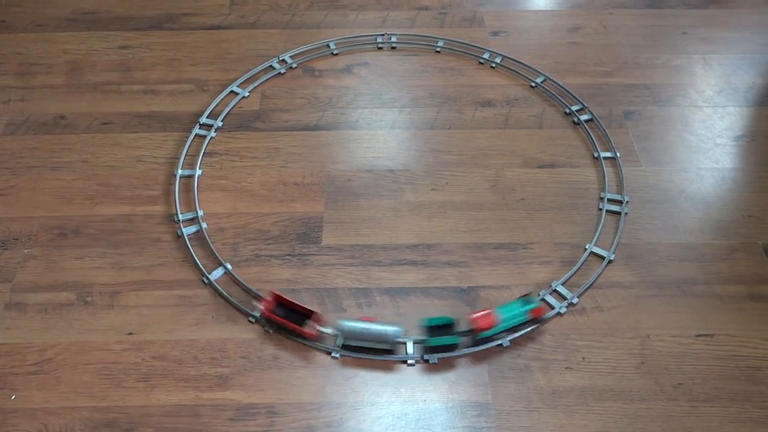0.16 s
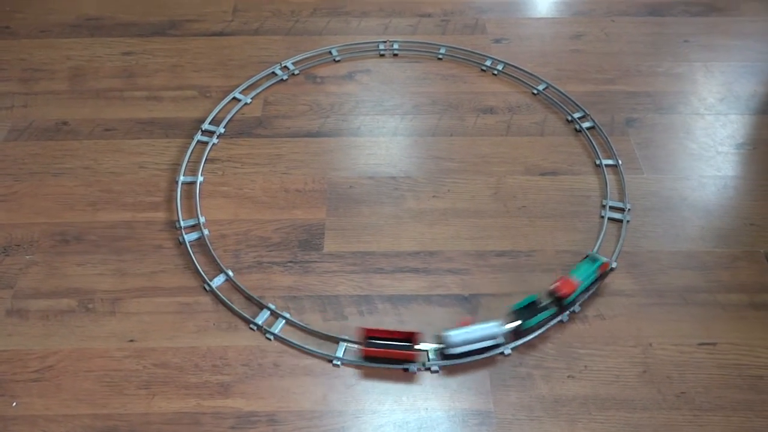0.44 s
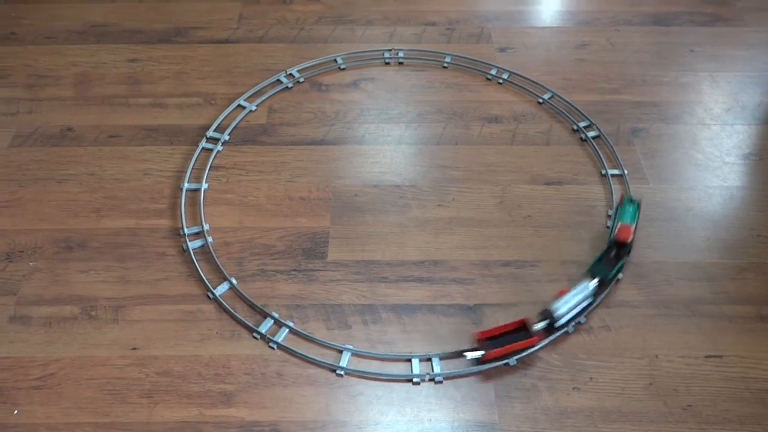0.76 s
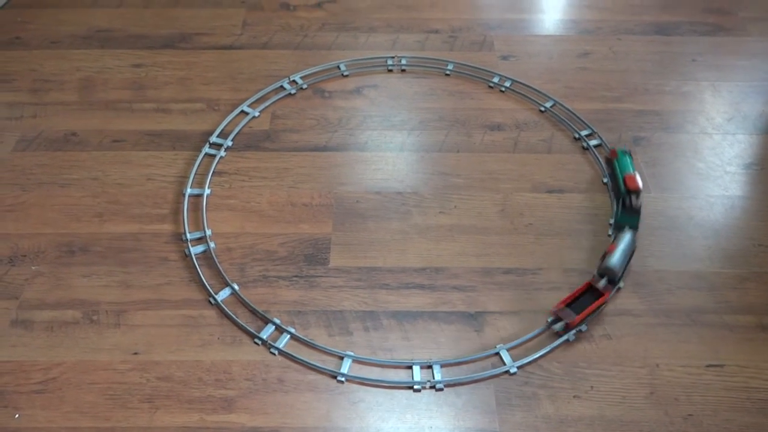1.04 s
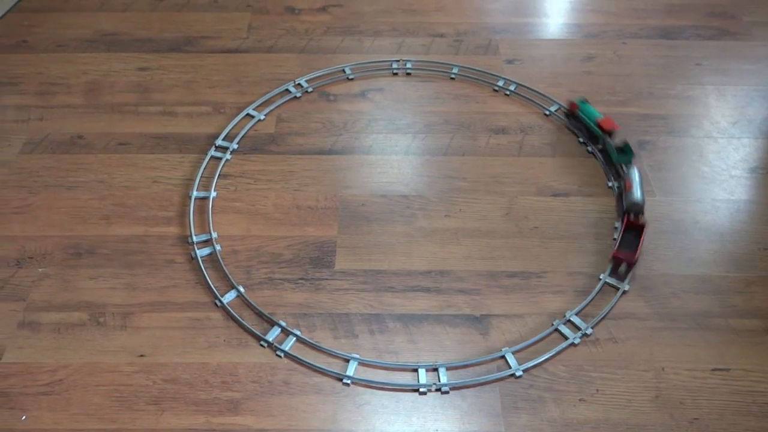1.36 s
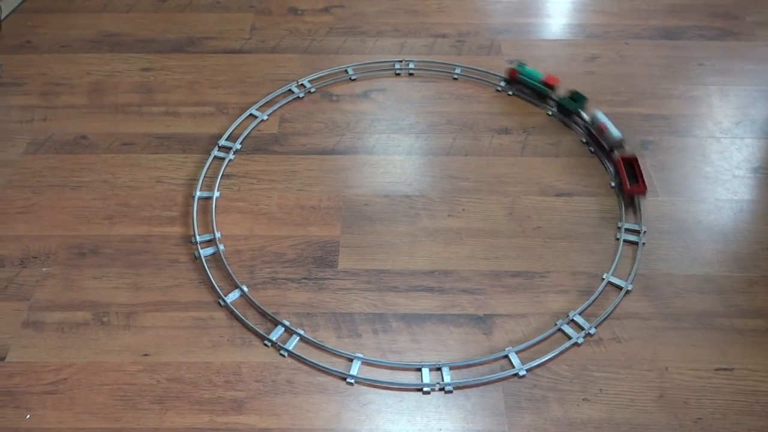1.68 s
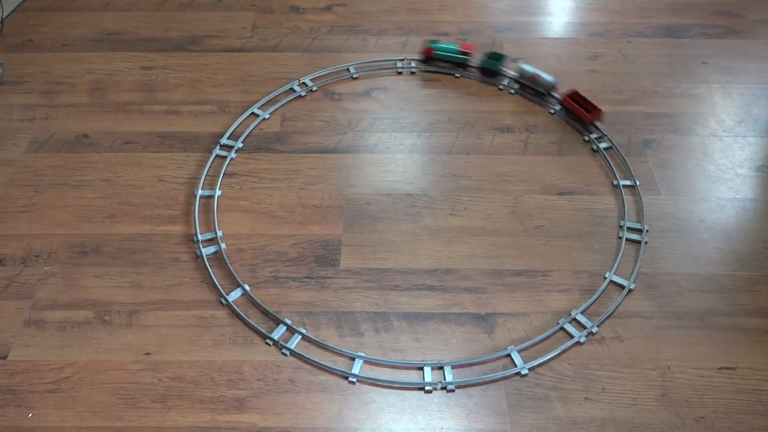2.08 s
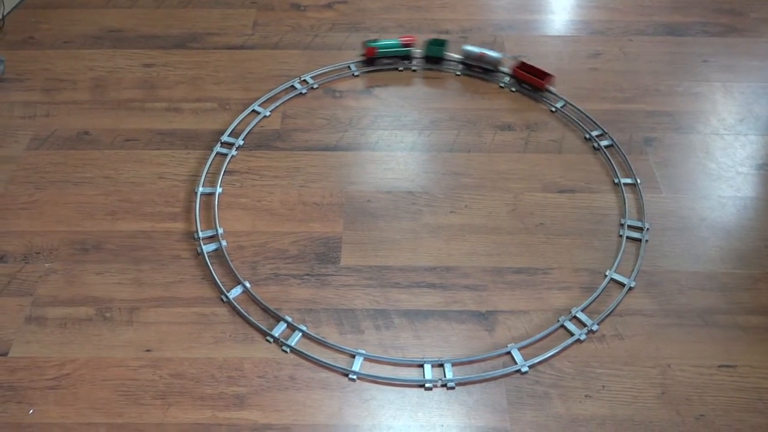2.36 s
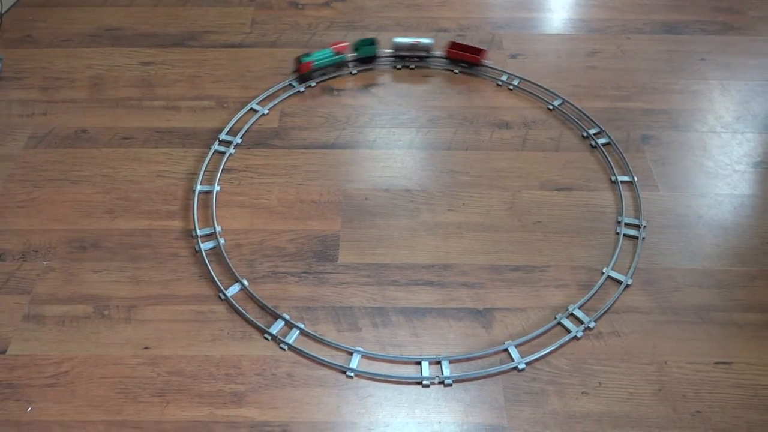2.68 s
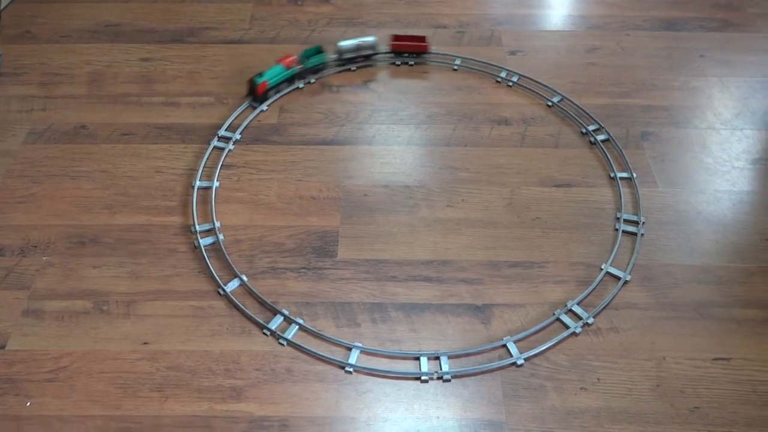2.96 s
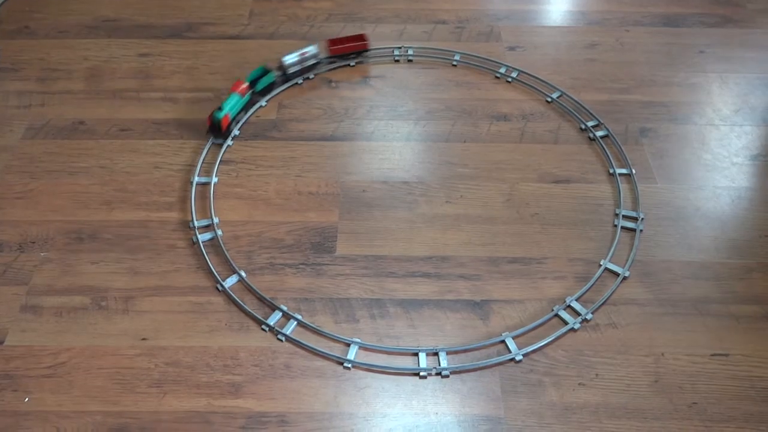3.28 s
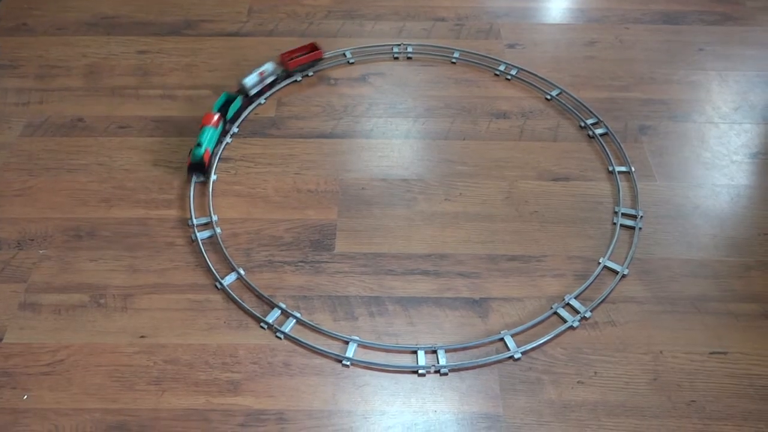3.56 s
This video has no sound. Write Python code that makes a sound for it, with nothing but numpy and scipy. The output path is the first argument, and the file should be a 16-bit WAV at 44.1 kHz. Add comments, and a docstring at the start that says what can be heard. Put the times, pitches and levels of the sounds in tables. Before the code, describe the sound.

A small clockwork toy train whirs continuously on metal track, with dense gear ticking, chattering wheels and sharp irregular joint clacks, softening slightly as it moves away from a nearby microphone in a small room.

```python
"""A clockwork toy train circles on metal track on a hard floor, moving away from the microphone.
Its gear teeth tick densely in the little body: trains of tiny impacts, filtered, with a fuzzy mesh note.
Wheels rumble, loose wheels and couplings chatter in short gated bursts, and small parts ping.
Rail joints clack with a knock and a ring of close modes; the track thuds softly on the floor.
A small room answers in stereo with a short diffuse tail, over a faint, uneven low rumble.
"""
import sys
import numpy as np
from scipy import signal
from scipy.fft import rfft, irfft
from scipy.io import wavfile
from scipy.ndimage import uniform_filter1d

SR = 44100
rng = np.random.default_rng(int(sys.argv[2]) if len(sys.argv) > 2 else 0)


def store_wav(level_fs):
    """Save 16-bit WAV to argv[1]."""
    pcm = np.round(np.clip(np.atleast_2d(level_fs), -1, 1) * 32767)
    wavfile.write(sys.argv[1], SR, pcm.T.astype(np.int16))


N = 164493
T = np.arange(N) / SR
HZ = np.fft.rfftfreq(N, 1 / SR)

# Relative spectrum of the faint low rumble: pitch_hz, level_db
RUMBLE_COLOUR = [(30, -14), (48, -13), (75, -3), (110, -4), (200, 5), (400, -6), (2000, -34)]
# Likeness of left and right in the room: pitch_hz, likeness (0 to 1)
STEREO_LIKENESS = [(60, 1), (170, 0.89), (490, 0.92), (1420, 0.81), (4080, 0.89), (11700, 0.89)]
# Left minus right as the train goes round: time_s, level_db
PAN = [(0, 0.2), (.9, -1.5), (1.7, -.9), (2.6, -0.4), (3.73, .3)]
# Soft thuds of the track on the floor, before smoothing: start_s, level_db
THUDS = [(.41, -51), (.445, -53.5), (.565, -59), (.595, -54), (.73, -54), (.755, -67), (.8, -55),
         (.835, -58), (2.69, -59)]
# Relative spectrum of the thuds: pitch_hz, level_db
THUD_COLOUR = [(20, -21), (70, -10), (120, 0), (180, 10.5), (260, 11), (500, -40)]
# Rolling wheels, before the roll trim: time_s, level_db
ROLL_LEVEL = [(0.03, -37), (0.1, -35.5), (0.26, -43.5), (0.35, -41), (0.5, -42.5), (0.8, -37), (0.87, -46),
              (0.94, -52), (1.02, -40), (1.09, -40.5), (1.13, -33), (1.17, -40.5), (1.55, -39),
              (1.8, -40.5), (2.13, -40.5), (2.2, -44.5), (2.44, -49), (2.49, -38), (2.53, -47.5),
              (2.74, -42.5), (2.81, -37.5), (2.92, -41.5), (3.15, -39.5), (3.23, -47), (3.41, -38),
              (3.55, -43), (3.63, -45), (3.69, -39.5)]
# Relative spectrum of the rolling: pitch_hz, level_db
ROLL_COLOUR = [(40, -45), (130, -37), (250, -30), (290, -19.5), (330, -6.5), (390, -6), (455, 4), (530, 2),
               (600, 3.5), (700, -1), (900, -39.5), (2000, -66.5)]
# Knocks of wheels on rail joints and of couplings: start_s, pitch_hz, knock_db, ring_db
CLACKS = [(.089, 8600, -20, -26), (.203, 4950, -18, -24), (.31, 5000, -22, -24), (.3505, 4900, -17, -26),
          (.5588, 4700, -18, -28), (.602, 10300, -20, -21), (.6105, 8700, -13, -26), (.739, 8500, -16, -29),
          (.921, 2000, -30, -30), (1.238, 4700, -19, -25), (1.383, 8000, -17, -24),
          (1.5965, 4700, -20, -25), (1.881, 10400, -22, -24), (1.9485, 4750, -18, -22),
          (2.005, 8600, -16, -27), (2.0608, 4700, -18, -27), (2.291, 8600, -15, -28),
          (2.336, 10200, -15, -21), (2.3447, 10300, -12, -20), (2.4495, 4800, -24, -23.5),
          (2.645, 9000, -17, -21), (2.8705, 4800, -14.5, -23), (3.3624, 4550, -6.5, -23),
          (3.3694, 4650, -17, -25), (3.371, 8300, -11, -23), (3.3765, 4800, -22, -26),
          (3.3915, 4900, -18, -24), (3.449, 4600, -17, -28), (3.453, 570, -42, -28),
          (3.6445, 7800, -17, -29)]
# Bursts of wheel and coupling chatter: start_s, length_s, level_db, brightness_db
RATTLES = [(0.079, 0.054, -27, -6), (0.179, 0.028, -25.5, -7), (0.302, 0.052, -32, -24),
           (0.392, 0.025, -24, -11), (0.452, 0.012, -22.5, 9), (0.491, 0.033, -22.5, -2),
           (0.552, 0.017, -25.5, -10), (0.604, 0.076, -28, 5), (0.695, 0.026, -24, 0),
           (0.725, 0.026, -24, 5), (0.83, 0.062, -27, 14), (0.906, 0.033, -22.5, -6),
           (1.001, 0.029, -24.5, 3), (1.091, 0.056, -23, 4), (1.212, 0.034, -24, 8),
           (1.375, .028, -21.5, 2), (1.572, 0.028, -25.5, 9), (1.802, 0.041, -24.5, -5),
           (1.849, 0.039, -30, -5), (1.937, 0.025, -22.5, -3), (1.993, 0.012, -24, 9),
           (2.277, 0.025, -23.5, 6), (2.335, 0.022, -31, 20), (2.451, 0.026, -28, -6),
           (2.497, 0.029, -23.5, 4), (2.552, 0.04, -27, 7), (2.642, 0.015, -24.5, 18),
           (2.695, 0.023, -25.5, 0), (2.863, 0.028, -26.5, -3), (2.973, 0.035, -30, -5),
           (3.107, 0.027, -29, 0), (3.139, .025, -25, -1), (3.259, 0.047, -26, 3), (3.372, 0.037, -23.5, 5),
           (3.436, 0.013, -28.5, -8), (3.626, 0.04, -24, -2)]
# Relative spectrum of the chatter: pitch_hz, level_db
RATTLE_COLOUR = [(200, -44.5), (450, -4), (1000, -4.5), (2500, -5), (3700, 1.5), (4600, 4), (5900, 2.5),
                 (7200, 3), (8500, 6), (11000, 0.5)]
# Gear whir, before the whir trim: time_s, level_db
WHIR_LEVEL = [(0, -22.8), (.09, -22.6), (.16, -24), (.23, -22.4), (.375, -23.8), (.45, -22.3), (.58, -22.8),
              (.66, -21.5), (.95, -22.3), (1.2, -21.8), (1.46, -22.9), (1.65, -21.9), (1.8, -22.5),
              (2.05, -22.8), (2.25, -24.5), (2.42, -25.2), (2.55, -24.5), (2.74, -25), (2.81, -23.8),
              (3.0, -24.5), (3.33, -25), (3.5, -25.7), (3.61, -28.5), (3.73, -24.8)]
# Lower, hollow part of the whir, before its trim: time_s, level_db
HOLLOW_LEVEL = [(0.03, -28.5), (0.12, -29.5), (0.28, -31.5), (0.33, -32.5), (0.38, -30.5), (0.41, -27.5),
                (0.43, -31), (0.95, -30), (2.03, -32), (2.08, -33.5), (3.34, -33), (3.37, -29),
                (3.43, -32.5), (3.69, -32)]
# Relative spectrum of the hollow part: pitch_hz, level_db
HOLLOW_COLOUR = [(200, -54), (450, -22), (720, -6), (850, -5), (1050, -2.5), (1250, -4.5), (1550, -4.5),
                 (1700, -4), (2150, -3), (2600, -5.5), (3300, -5), (6000, -48)]
# Relative spectra of the whir on the near, right-hand and far parts of the circle: pitch_hz, level_db
NEAR_COLOUR = [(1290, -29), (2200, -9), (2940, -2.5), (3770, -5), (4430, 1), (7700, -0.5), (8350, 0),
               (11000, -3.5), (14300, -35), (22000, -120)]
RIGHT_COLOUR = [(1290, -26), (2200, -16), (2520, -9.5), (3190, -8.5), (3340, -3), (3930, -4), (4460, -5),
                (5800, -7.5), (7440, -1), (8070, 1), (9360, -4.5), (10500, -1.5), (11000, -5.5),
                (14300, -46), (22000, -120)]
FAR_COLOUR = [(1290, -33), (2200, -19), (2420, -9.5), (2660, -7), (3230, -4.5), (3980, -1), (4290, -1.5),
              (4770, 1), (5920, -3), (6640, 0.5), (9110, 0.5), (10600, -1), (11000, -1.5), (14300, -51),
              (22000, -120)]
# Times that steer the near, right-hand and far colours: time_s
PLACE_TIMES = [0.64, 2.1, 2]
# Ringing of body and rails, before it follows the whir: pitch_hz, width_hz, near_db, far_db
BODY_MODES = [(470, 40, -46, -47), (620, 65, -51, -55.5), (988, 97, -50, -47), (1370, 34, -58, -45.5),
              (1432, 53, -58, -49), (3420, 120, -50, -49.5), (4680, 1240, -33.5, -31.5),
              (5330, 370, -39, -57), (6670, 85, -41, -46), (8470, 1440, -34.5, -33.5),
              (9000, 300, -47, -43)]
# Gear mesh note, which follows the speed: time_s, pitch_hz, level_db
MESH = [(0, 2042, -49), (.25, 2020, -48), (.335, 2011, -37.5), (.38, 2012, -47), (1, 2020, -45.5),
        (1.24, 2030, -40.5), (1.38, 2020, -45), (1.7, 2016, -38), (1.82, 1998, -38.5), (1.89, 1998, -42),
        (2.16, 1982, -40), (2.42, 1920, -43.5), (2.55, 1901, -42), (2.95, 1891, -44.5), (3.2, 1945, -41.5),
        (3.73, 1960, -44)]

EDGE_HZ = 11040  # top of the recorded band
BODY_LOW_HZ = 342
WET_DB, ROOM_T60_S, ECHO_CHANGE_S, SIDE_DB = -8.5, 0.32, 0.25, 5
CHATTER_PER_S = 135  # impacts in the rolling and in the rattles
WHIR_TRIM_DB, HOLLOW_TRIM_DB, ROLL_TRIM_DB = -0.32, -1.5, -1.5
TICK_SPREAD_DB = 2.5
TEETH_PER_TICK, TICK_JITTER, TICK_S, TICK_BED = 7, 0.2, 0.001, 0.55
SPLIT_HZ = 6200  # coarse gears sound below this, fine gears above
MESH_WAVER, MESH_FLUTTER_DB, MESH_FLUTTER_HZ = 0.009, 1.2, 22  # waver: rms fraction of pitch


def amp(db):
    """Decibels to gain."""
    return 10 ** (np.asarray(db) / 20)


def unit(x):
    """Scales to rms 1."""
    return x / np.sqrt(np.mean(x ** 2) + 1e-20)


def curve(rows, axis=1):
    """One column of a time table at every sample."""
    rows = np.array(rows)
    return np.interp(T, rows[:, 0], rows[:, axis])


def read(points):
    """A spectrum table at every frequency, joined along log frequency."""
    f, value = np.transpose(points)
    return np.interp(np.log(HZ + 1), np.log(f + 1), value)


def colour(x, points):
    """Causal filter with the given spectrum, falling steeply below it, and a power gain of 1."""
    octaves_below = np.log2(np.clip(HZ / max(points[0][0], 1), .01, 1))
    gain = np.maximum(unit(amp(read(points) + 24 * octaves_below)), 1e-5)
    # folding the cepstrum forward gives minimum phase
    cepstrum = irfft(np.log(gain), N)
    cepstrum[1:N // 2] *= 2
    cepstrum[N // 2 + 1:] = 0
    return irfft(rfft(x) * np.exp(rfft(cepstrum)), N)


def noise(top_hz=EDGE_HZ):
    """Flat noise up to a frequency."""
    return unit(irfft(rfft(rng.standard_normal(N)) * (HZ < top_hz), N))


def fade(hits, seconds):
    """Each hit dies away exponentially."""
    return signal.lfilter([1], [1, -np.exp(-1 / (seconds * SR))], hits)


def strikes(rows):
    """Impulses from start_s, level_db rows."""
    out = np.zeros(N)
    for s, db in rows:
        out[int(s * SR)] += amp(db)
    return out


def ticks(rate, jitter, seconds, bed):
    """Uneven train of tiny scraping impacts over a bed of friction."""
    turns = np.cumsum(rate * (1 + jitter * noise(np.mean(rate) / 2))) / SR
    strength = amp(TICK_SPREAD_DB * np.clip(rng.standard_normal(N), -2, 2))
    hits = (np.diff(np.floor(turns), prepend=0) > 0) * strength
    # powers add, so the squared hits fade in half the time
    power = bed ** 2 + fade(hits ** 2, seconds / 2)
    return unit(np.sqrt(power) * noise())


def no_bass(x):
    """The small body radiates no bass."""
    return signal.sosfilt(signal.butter(4, BODY_LOW_HZ, "high", fs=SR, output="sos"), x)


def resonate(x, hz, width):
    """A steep resonance that can follow a curve: shift to 0 Hz, low-pass twice, shift back."""
    turn = np.exp(2j * np.pi * np.cumsum(hz * np.ones(N)) / SR)
    r = np.exp(-np.pi * np.sqrt(2) * width / SR)
    envelope = signal.lfilter([(1 - r) ** 2], [1, -2 * r, r * r], x / turn)
    return unit(no_bass((turn * envelope).real))


def low_rumble():
    """Faint low noise behind the train, its level wandering unevenly."""
    return unit(colour(noise(), RUMBLE_COLOUR)) * amp(-87 + 8 * noise(9))


def room_tail():
    """Sparse random echoes that decay over the room's reverberation time."""
    t = T[:SR // 3]
    taps = rng.standard_normal(len(t)) * (rng.random(len(t)) < 4000 / SR) * (t > .003)
    taps = taps * amp(-60 * t / ROOM_T60_S)
    return amp(WET_DB) * taps / np.linalg.norm(taps)


def room_echoes(x):
    """Overlapping stretches of sound, each with its own tail, as the train moves."""
    out, hop = np.zeros(N), int(ECHO_CHANGE_S * SR)
    for centre in range(0, N + hop, hop):
        at = np.arange(max(centre - hop, 0), min(centre + hop, N))
        stretch = x[at] * np.cos(np.pi / 2 * (at - centre) / hop)
        wet = signal.fftconvolve(stretch, room_tail())[:N - at[0]]
        out[at[0]:at[0] + len(wet)] += wet
    return out


def room(x):
    """Direct sound with a diffuse tail; a second set of echoes goes oppositely to left and right."""
    mid = (x + room_echoes(x)) / np.sqrt(1 + amp(WET_DB) ** 2)
    unlike = np.sqrt(np.clip(1 - read(STEREO_LIKENESS), 0, 1))
    side = irfft(rfft(room_echoes(x)) * unlike, N) * amp(SIDE_DB)
    pan_db = curve(PAN)
    return np.array([(mid + side) * amp(pan_db / 2), (mid - side) * amp(-pan_db / 2)])


def track_thuds():
    """The track knocks softly on the floor: low noise in smoothed, dying pulses."""
    pulses = uniform_filter1d(strikes(THUDS), 400)
    return unit(colour(noise(), THUD_COLOUR)) * fade(pulses, seconds=0.02)


def rolling_wheels():
    """Wheels on the rails: dense uneven impacts, filtered low, swelling in lumps."""
    impacts = ticks(CHATTER_PER_S, jitter=0.37, seconds=0.0012, bed=0.53)
    roll = unit(colour(impacts, ROLL_COLOUR) * amp(1.5 * noise(14)))
    return roll * amp(curve(ROLL_LEVEL) + ROLL_TRIM_DB)


def clacks():
    """A very short knock at a joint or coupling, then a cluster of close modes rings in the metal."""
    knock_s, ring_s, rise_s, spread = .0005, .012, .001, .065  # spread: fraction of pitch
    t, out = T[:SR // 12], np.zeros(N + SR)
    ring_shape = (1 - np.exp(-t / rise_s)) * np.exp(-t / ring_s)
    for s, hz, knock_db, ring_db in CLACKS:
        knock = np.sin(2 * np.pi * hz * t) * t / knock_s * np.exp(1 - t / knock_s)
        modes_hz = hz * (1 + spread * rng.standard_normal(size=(16, 1)))
        phases = rng.random(modes_hz.shape)
        ring = unit(np.sin(2 * np.pi * (modes_hz * t + phases)).sum(0))
        out[int(s * SR):][:len(t)] += amp(knock_db) * knock + amp(ring_db) * ring * ring_shape
    return no_bass(out[:N])


def rattles():
    """Loose parts bounce rapidly for a few hundredths of a second."""
    edge_s = .004
    impacts = ticks(CHATTER_PER_S, jitter=0.28, seconds=0.0076, bed=0.4)
    chatter = unit(colour(impacts, RATTLE_COLOUR))
    bright_share = np.clip(read([(4500, 0.17), (10500, 0.79)]), 0, 1)
    bright = irfft(rfft(chatter) * bright_share, N)
    dull = chatter - bright
    out = np.zeros(N)
    for start, length, db, bright_db in RATTLES:
        gate = np.clip(np.minimum(T - start, start + length - T) / edge_s + .5, 0, 1)
        out += gate * amp(db) * (bright * amp(bright_db / 2) + dull * amp(-bright_db / 2))
    return out


def pings():
    """Small metal parts, shaken at random, each ring briefly at their own pitch."""
    low_hz, high_hz, per_s, decay_s = 6455, 10570, 150, 0.0073
    t, out = T[:SR // 12], np.zeros(N + SR)
    hz = rng.uniform(low_hz, high_hz, N)
    for at in np.flatnonzero(rng.random(N) < per_s / SR):
        out[at:at + len(t)] += np.sin(2 * np.pi * hz[at] * t) * np.exp(-t / decay_s)
    ringing = unit(colour(out[:N], [(low_hz / 2, 0), (high_hz, 0)]))
    return ringing * amp(curve(WHIR_LEVEL) - 10.5)


def body_ringing(far):
    """Noise through the modes of body and rails, their balance shifting with distance."""
    out = np.zeros(N)
    for hz, width, near_db, far_db in BODY_MODES:
        out += resonate(noise(), hz, width) * amp(near_db + (far_db - near_db) * far)
    whir_db = curve(WHIR_LEVEL)
    return out * amp(whir_db - whir_db.mean())


def mesh_note(drive, mesh_hz):
    """The meshing teeth sing a fuzzy note: a narrow resonance that wavers and flutters."""
    wavering_hz = mesh_hz * (1 + MESH_WAVER * noise(MESH_FLUTTER_HZ))
    note = resonate(drive, wavering_hz, width=50)
    note = unit(note * amp(MESH_FLUTTER_DB * noise(MESH_FLUTTER_HZ)))
    return note * amp(curve(MESH, axis=2))


def clockwork():
    """Coarse and fine gears tick and whir at a rate tied to the mesh note; the body rings."""
    mesh_hz = curve(MESH)
    tick_rate = mesh_hz / TEETH_PER_TICK
    # two separate tick trains at one rate, each heard in its own band
    coarse = rfft(ticks(tick_rate, TICK_JITTER, TICK_S, TICK_BED))
    fine = rfft(ticks(tick_rate, TICK_JITTER, TICK_S, TICK_BED))
    drive = irfft(np.where(HZ < SPLIT_HZ, coarse, fine), N) * amp(.5 * noise(30))
    # near fades towards right-hand; past the last listed time only far is heard
    shares = [np.interp(T, PLACE_TIMES, row) for row in np.eye(3)]
    colours = (NEAR_COLOUR, RIGHT_COLOUR, FAR_COLOUR)
    whir = sum(share * unit(colour(drive, c)) for share, c in zip(shares, colours))
    whir = whir * amp(curve(WHIR_LEVEL) + WHIR_TRIM_DB)
    hollow = unit(colour(ticks(tick_rate, TICK_JITTER, TICK_S, bed=0.99), HOLLOW_COLOUR))
    hollow = hollow * amp(curve(HOLLOW_LEVEL) + HOLLOW_TRIM_DB)
    return whir + hollow + body_ringing(far=1 - shares[0]) + mesh_note(drive, mesh_hz)


def scene():
    """The train in the room, over a faint, uneven low rumble."""
    train = track_thuds() + rolling_wheels() + clacks() + rattles() + pings() + clockwork()
    return room(low_rumble() + train)


def record(dry):
    """The recorder's band limit: a steep low-pass."""
    low_pass = signal.firwin(1023, EDGE_HZ, window=("kaiser", 9), fs=SR)
    return signal.oaconvolve(dry, low_pass[None], "same")


dry = scene()
out = record(dry)
store_wav(out)
```